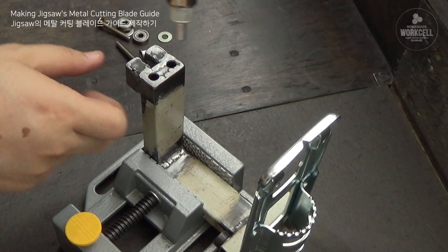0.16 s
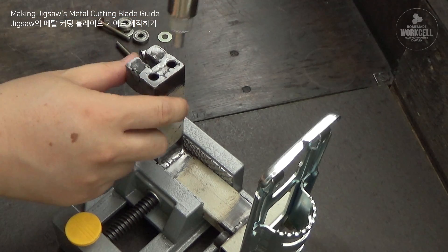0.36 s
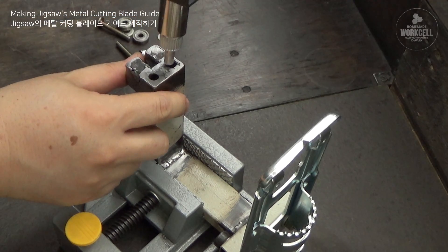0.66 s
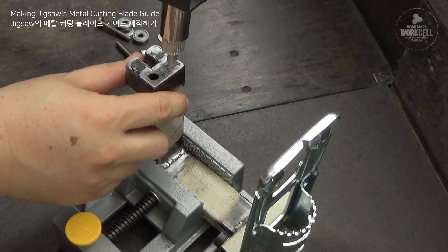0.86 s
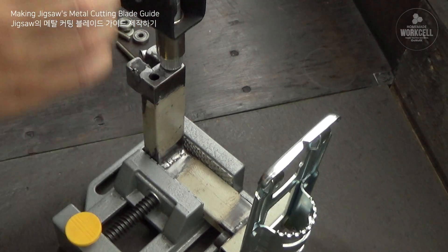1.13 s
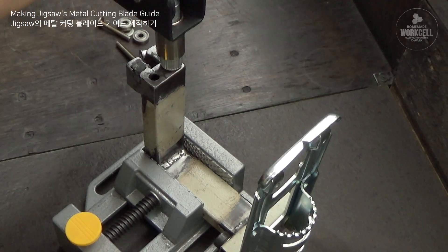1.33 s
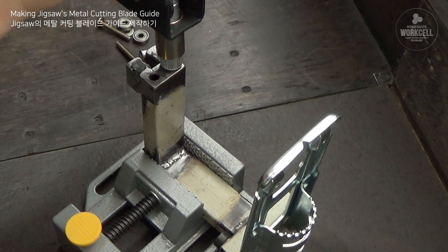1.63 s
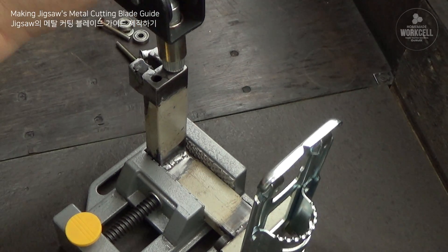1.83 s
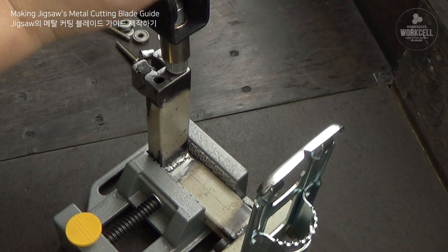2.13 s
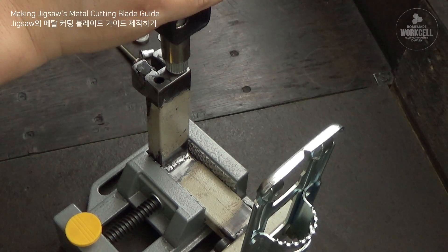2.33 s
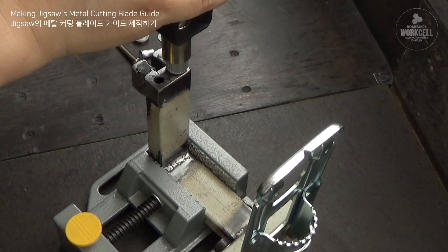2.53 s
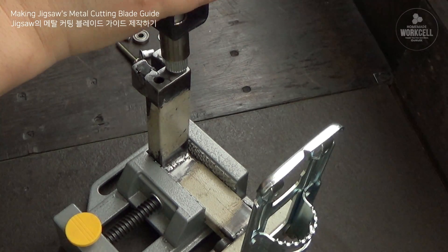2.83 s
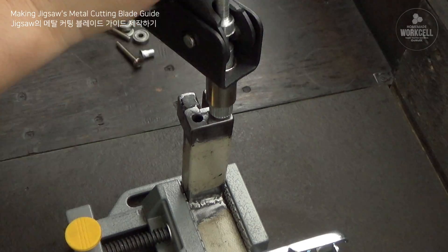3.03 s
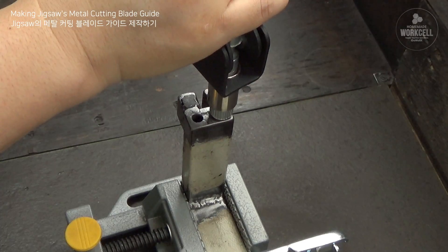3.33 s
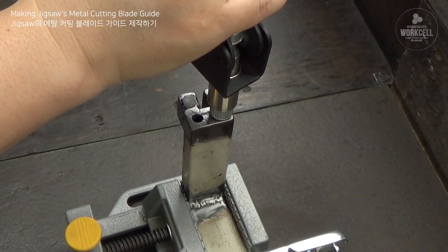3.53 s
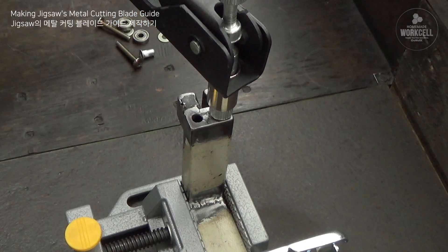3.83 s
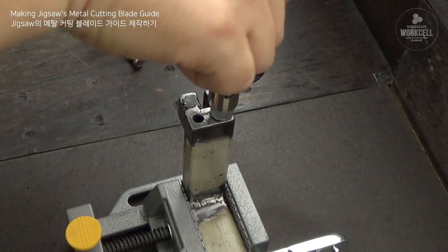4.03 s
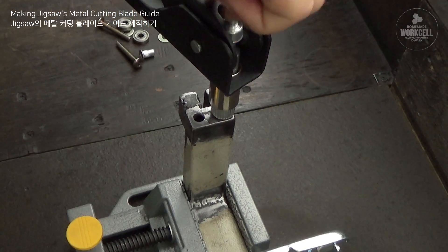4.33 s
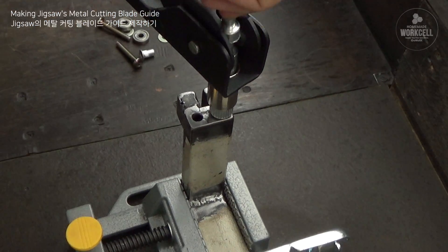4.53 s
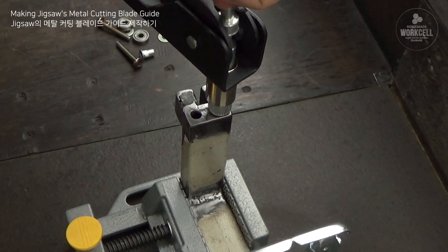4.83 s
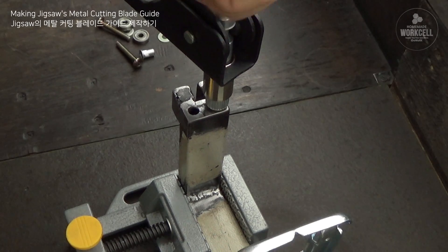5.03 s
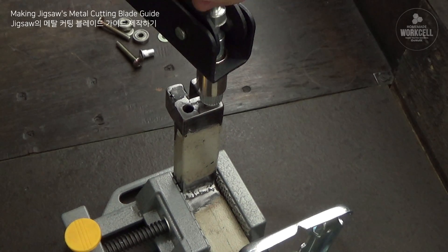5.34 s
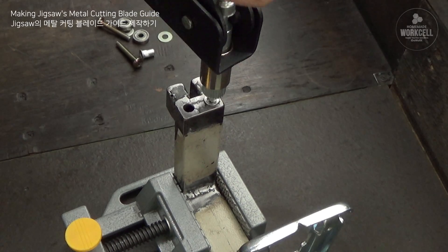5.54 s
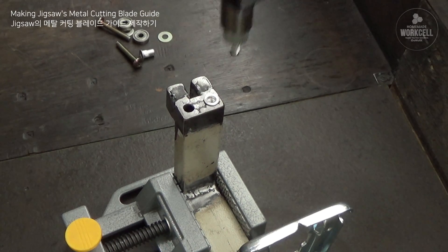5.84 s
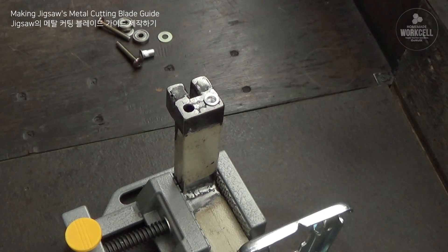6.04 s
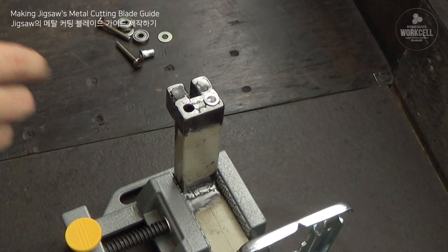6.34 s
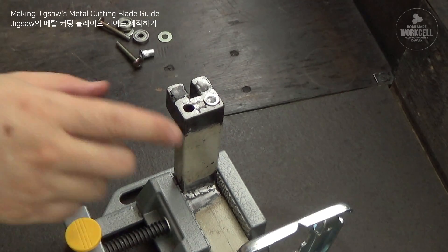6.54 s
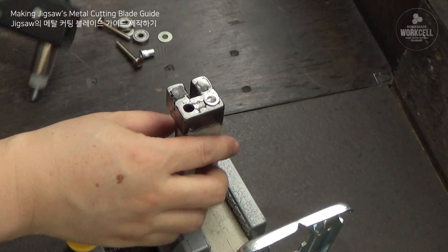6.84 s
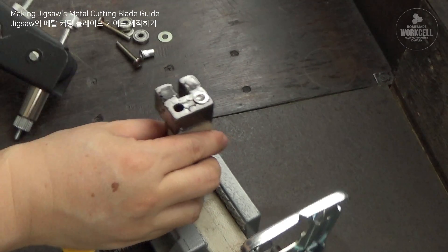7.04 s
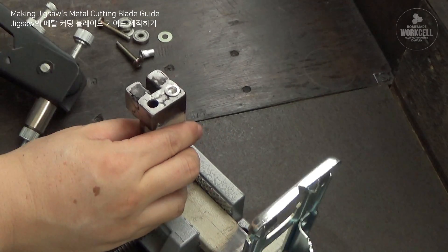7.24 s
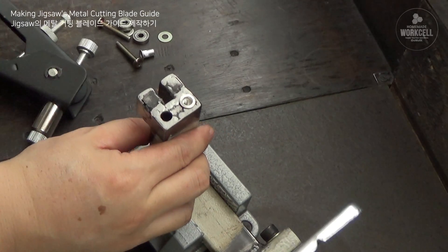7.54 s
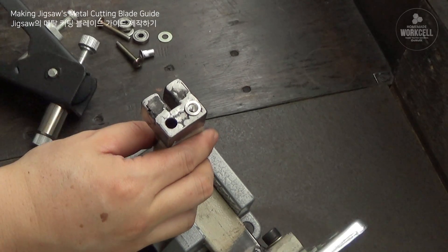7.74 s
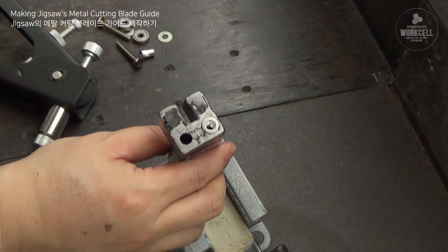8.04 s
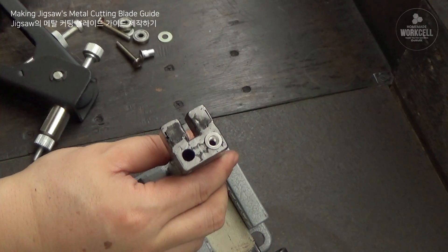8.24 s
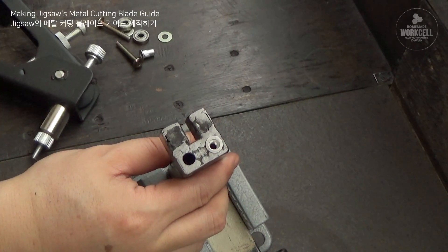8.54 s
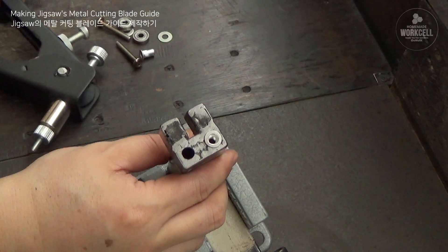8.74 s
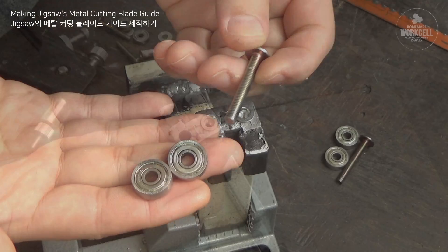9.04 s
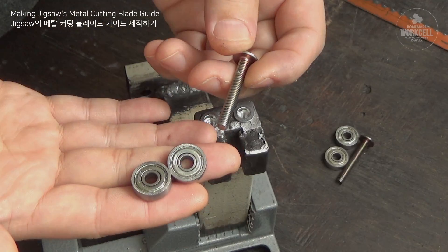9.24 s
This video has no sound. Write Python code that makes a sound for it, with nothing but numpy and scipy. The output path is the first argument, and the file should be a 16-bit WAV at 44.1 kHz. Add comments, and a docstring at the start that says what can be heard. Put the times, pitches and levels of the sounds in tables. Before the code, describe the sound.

A quiet room holds faint hiss and distant traffic. From about 0.6 seconds a hand rivet tool clinks against a steel block in a small vice, close by, with dull knocks through the wooden bench. The loudest clink and knock come near 1.1 seconds, with a brief scrape and tiny squeak; softer taps follow until 2 seconds. From 2.6 seconds the work is sped up and high-pitched: the pumped handles creak and tick lightly. From about 4.2 to 5.6 seconds the knob is unscrewed in a rapid, growing run of crunchy metallic clicks. Normal speed returns with one small clink at 5.8 seconds. At 6.9 seconds the tool lands on the bench with a bright clatter and rocks briefly. The vice is softly dragged and bumped, with a knock and clink at 7.8 seconds, another knock at 8.9 and faint rubbing afterwards.

```python
"""Rivet-nut tool at a workbench

A hand rivet-nut tool is set on a steel block in a small vice, pumped, unscrewed and laid down; the vice
is dragged and tapped on the wooden bench. Impacts excite the normal modes of wood and steel, and friction
drives them with dense clicks. Far traffic swells outside the quiet room. The pumping and unscrewing is
sped up about eight times, so all of it sounds three octaves higher."""
import sys
import numpy as np
from scipy import signal
from scipy.fft import rfft, irfft, next_fast_len
from scipy.io import wavfile

SR = 44100
rng = np.random.default_rng(int(sys.argv[2]) if len(sys.argv) > 2 else 0)


def dump(signal):
    """Clip the signal to [-1, 1] and save it as 16-bit WAV at the path in sys.argv[1]."""
    limited = np.clip(np.atleast_2d(signal).T, -1, 1)
    pcm = np.round(limited * 32767).astype(np.int16)
    wavfile.write(sys.argv[1], SR, pcm)


N = 413658

FAST_FROM_S, FAST_TO_S, SPEEDUP = 2.642, 5.632, 7.8
# modes of bench and vice: (frequency [Hz], level [dB], level when sped up [dB], t60 [s])
BENCH_MODES = [(129.5, -4, -2, 0.23), (183.6, -6, -29, 0.15), (281, -1, -14, 0.15), (359.3, -9, -5, 0.12),
               (386, 1, -16, 0.05), (478, 4, 5.5, 0.092), (585, -4, 0, 0.099), (665, -1, 3, 0.09),
               (800, 0.5, 4, 0.03), (1157, -20.5, 2.5, 0.056), (1995, -35, -8, .08)]
# blows to the bench: (time [s], level [dB], centre frequency [Hz], boost of the deepest mode [dB])
BENCH_BLOWS = [(0.628, -29, 593, 5), (0.635, -46, 573, 0.5), (0.761, -36, 482, -2), (0.798, -44, 286, -8),
               (0.927, -44, 142.5, 2.5), (0.953, -42.5, 131.4, -2.5), (1.114, -32, 585, 0),
               (1.146, -17.5, 445, -7), (1.558, -50, 323, 12), (1.591, -49.5, 503, 15.5),
               (1.602, -44, 554, 1.5), (1.66, -46.5, 137, -0.5), (1.793, -48, 358, -2.5),
               (1.884, -64.5, 126, 4.5), (6.899, -32.5, 299, 6.5), (7.013, -41.5, 288, 8.5),
               (7.079, -33.5, 315, -1.5), (7.47, -48, 176, -3), (7.626, -53, 734, 0),
               (7.798, -31, 448, -4.5), (7.806, -29.5, 405, -6), (7.817, -29, 298, -5),
               (8.169, -61, 152, 0.5), (7.877, -51, 330, -1.5), (8.882, -31, 514, -5)]


def from_db(db):
    """Amplitude ratio of a level in decibels."""
    return np.exp(np.asarray(db) * (np.log(10) / 20))


def unit_rms(x):
    """Normalisation to a root mean square of 1."""
    return x / np.sqrt(np.mean(x ** 2) + 1e-20)


def add(out, start_s, sound):
    """Superposition of a short sound on out."""
    i = round(start_s * SR)
    out[i:i + len(sound)] += sound[:N - i]


def filtered(x, order, edge_hz, kind="low"):
    """Butterworth filtering: a maximally flat passband."""
    return signal.sosfilt(signal.butter(order, edge_hz, kind, fs=SR, output="sos"), x + 1e-18)


def at_hz(points, hz):
    """Interpolation of (frequency, value) points on a logarithmic frequency axis."""
    known_hz, values = np.transpose(points)
    return np.interp(np.log(hz), np.log(known_hz), values)


def shaped(x, spectrum):
    """Zero-phase filtering by a curve of (frequency [Hz], gain [dB])."""
    size = next_fast_len(N)
    hz = np.maximum(np.arange(size // 2 + 1) * SR / size, 1)
    return irfft(rfft(x, size) * from_db(at_hz(spectrum, hz)), size)[:N]


def ring(x, hz, t60):
    """Damped resonator: a unit impulse starts a decaying sine of amplitude 1."""
    radius, angle = from_db(-60 / (t60 * SR)), 2 * np.pi * min(hz, .45 * SR) / SR
    return signal.lfilter([0, np.sin(angle)], [1, -2 * radius * np.cos(angle), radius ** 2], x + 1e-18)


def drift(rate_hz):
    """Slow random modulation: low-passed noise of rms 1."""
    pole = np.exp(-2 * np.pi * rate_hz * 40 / SR)   # one value every 40 samples
    slow = signal.lfilter([1], [1, -2 * pole, pole ** 2], rng.standard_normal(N // 40 + 2002))[2000:]
    return np.interp(np.arange(N) / 40, np.arange(len(slow)), unit_rms(slow))


def clicks(per_s, spread_db):
    """Shot noise: random impulses of uneven size, rms 1."""
    sizes = from_db(spread_db * np.minimum(rng.exponential(1, N), 5)) * rng.choice([-1, 1], N)
    return unit_rms(sizes * (rng.random(N) < per_s / SR))


def stereo_noise(spectrum, coherence):
    """Partly coherent noise of rms 1: the mid-to-side ratio sets how alike left and right are."""
    hz = np.maximum(np.arange(N // 2 + 1) * SR / N, 1)
    alike = np.clip(at_hz(coherence, hz), 0, 1)
    mid, side = rfft(rng.standard_normal((2, N))) * from_db(at_hz(spectrum, hz))
    return unit_rms(irfft(np.sqrt(1 + alike) * mid + np.sqrt(1 - alike) * side * [[1], [-1]], N))


def swells(rows):
    """Amplitude envelopes through rows of (time [s], levels [dB]), fading out 20 ms beyond each end."""
    t = np.arange(N) / SR
    times, *levels_db = np.transpose(rows)
    gate = np.clip(np.minimum(t - times[0], times[-1] - t) / .02 + 1, 0, 1)
    return gate * from_db([np.interp(t, times, db) for db in levels_db])


def strokes(rows, rise_db_per_s, fade_db_per_s):
    """Incoherent addition: strokes rise, hold, fade and sum in power; one envelope per level column."""
    t, power = np.arange(N // 32 + 1) * 32 / SR, 0
    for start, hold, *levels_db in rows:
        loss_db = rise_db_per_s * np.maximum(start - t, 0) + fade_db_per_s * np.maximum(t - start - hold, 0)
        power = power + from_db(np.array(levels_db)[:, None] - loss_db) ** 2
    return [np.interp(np.arange(N) / SR, t, np.sqrt(p)) for p in power]


def room(x, speed):
    """Reverberation as convolution with decaying noise; speed shortens it and raises the band edges."""
    t = np.arange(round(SR / 2 / speed)) / SR
    tail_t60, early_t60 = 0.17 / speed, 0.027 / speed
    echoes = rng.standard_normal((4, len(t))) * from_db(-60 * t / tail_t60) * (t > .003 / speed)
    response = filtered(echoes[0] + echoes[1:3], 1, min(9200 * speed, 18000))
    response *= from_db(-10.5) / np.sqrt(np.sum(response ** 2) / 2)
    early = echoes[3] * from_db(-60 * t / early_t60)   # bench reflections differ left and right
    response += from_db(-14) * early / np.sqrt(np.sum(early ** 2)) * [[1], [-1]]
    left, right = x + signal.fftconvolve(x[None], response, axes=1)[:, :N]
    # long waves reach the closely spaced microphones alike, and the deep bass is lost
    side = filtered(left - right, 2, 610 * speed ** 1.1, "high")
    heard = (left + right + side * [[1], [-1]]) / 2
    return filtered(heard, 7, 110.9 * speed ** 0.841, "high")


def background():
    """Broadband noise: far traffic swells over the hiss of room and microphone."""
    # traffic, one span each side of the fast part: (time [s], roar level [dB], tyre level [dB])
    traffic_spans = [
        [(0.0, -69, -69.5), (0.6, -71.5, -75), (1.3, -65.5, -65), (1.97, -67, -68.5), (2.34, -64.5, -66),
         (2.64, -65.5, -68)],
        [(5.63, -63, -67), (6.16, -63.5, -65.5), (6.9, -69.5, -72), (7.31, -67, -65), (8.18, -69, -72.5),
         (8.83, -67, -68.5), (8.87, -61.5, -62.5), (9.38, -68.5, -64)],
    ]
    # spectra of traffic roar, tyre noise and hiss: (frequency [Hz], spectral level [dB])
    roar_spectrum = [(40, -38), (75, -22), (105, -22.5), (140, -4), (190, -10), (260, -8.5), (350, -6.5),
                     (480, -1), (620, -0.5), (800, 2), (1000, -11.5), (1500, -26.5), (3000, -45)]
    tyre_spectrum = [(500, -40), (900, -3), (1100, 0), (1400, -3), (1800, -6), (2300, -13), (3000, -40)]
    hiss_spectrum = [(900, -30), (1800, -3), (2300, 0), (3000, 0), (4000, -2), (5200, -4), (7000, -6),
                     (9000, -7), (11000, -10), (13500, -13), (16000, -15)]
    # likeness of left and right: (frequency [Hz], coherence [0-1])
    coherence = [(150, .99), (300, .9), (600, .75), (1500, .55), (4000, .62), (8000, .72), (13000, .93)]
    roar_gain, tyre_gain = sum(swells(span) for span in traffic_spans)
    roar = roar_gain * stereo_noise(roar_spectrum, coherence)
    tyres = tyre_gain * stereo_noise(tyre_spectrum, coherence)
    hiss_db = np.where(np.arange(N) / SR < 8.85, -71.5, -68)   # steps up near the end
    return roar + tyres + from_db(hiss_db) * stereo_noise(hiss_spectrum, coherence)


def fast_background():
    """Time compression shifts the noise of traffic and room into the treble."""
    # swell of the noise: (time [s], level [dB])
    levels = [(2.64, -64.5), (3.09, -60), (3.46, -68), (3.8, -69.5), (4.2, -66), (4.6, -63), (4.98, -61.5),
              (5.63, -67.5)]
    # its spectrum: (frequency [Hz], spectral level [dB])
    spectrum = [(120, -76), (200, -38), (851, -23), (1000, -11), (1680, -18), (1840, -16), (2560, -15.5),
                (2700, -13), (3370, -9.5), (3690, -9.5), (4680, -8), (5040, -6.5), (16000, -18.5)]
    # likeness of left and right: (frequency [Hz], coherence [0-1])
    coherence = [(60, 0.24), (240, 0.78), (950, 1), (3770, 0.939), (15000, 0.59)]
    return swells(levels) * stereo_noise(spectrum, coherence)


def engine():
    """Periodic firing gives a harmonic series, rising as an engine pulls away outside."""
    # the sped-up engine: (time [s], firing frequency [Hz], level [dB])
    run_up = [(2.649, 321, -81), (2.9, 337.7, -94.5), (3.1, 351, -78), (3.25, 359.4, -81.5),
              (3.397, 368.6, -98)]
    # its harmonics: (order [multiple of the firing frequency], level [dB])
    harmonics = [(1, -21), (3, -1.5), (4, -0.5), (6, 3), (8, 4), (10, 6.5)]
    times, firing_hz, level_db = np.transpose(run_up)
    t = np.arange(N) / SR
    phase = 2 * np.pi * np.cumsum(np.interp(t, times, firing_hz)) / SR
    tones = sum(from_db(db + 2 * drift(20)) * np.sin(order * phase) for order, db in harmonics)
    return from_db(np.interp(t, times, level_db, right=-200)) * tones


def squeaks():
    """Stick-slip friction: dense slips of steel pass twice through one narrow resonance."""
    # squeaks of sliding steel: (time [s], hold [s], frequency [Hz], level [dB])
    events = [(1.044, 0.026, 5410, -64.5), (1.048, 0.053, 4590, -71), (1.05, 0.094, 8240, -65),
              (1.076, .04, 6700, -63), (1.862, 0.065, 7960, -69), (1.879, 0.047, 9750, -68.5)]
    slips, out = clicks(8000, 1.9), np.zeros(N)
    for start, hold, hz, db in events:
        envelope, = strokes([(start, hold, db)], 500, 500)
        out += envelope * unit_rms(ring(ring(slips, hz, t60=.012), hz, t60=.012))
    return out


def steel_friction():
    """Roughness noise: steel on steel rasps, while the denser contacts of skin on steel hiss."""
    # steel scraping steel; fingers and tool sliding over it: (time [s], hold [s], level [dB])
    scrapes = [(0.98, 0.013, -63.5), (1.11, .025, -55), (1.18, 0.0042, -42), (7.79, 0.038, -60)]
    slides = [(1.86, 0.028, -65), (7.1, 0.0287, -56.5), (7.3, 0.237, -66), (8.17, 0.037, -71.5)]
    # spectra of the two contacts: (frequency [Hz], spectral level [dB])
    scrape_spectrum = [(590, -35), (1000, -21), (2040, -40.5), (2160, -10), (2840, -5.5), (4080, -15),
                       (4460, -8.5), (5860, -10), (6710, -5), (15000, -22.5)]
    slide_spectrum = [(1060, -26), (1800, -18.5), (2540, 3), (3790, 4), (5270, -0.5), (7060, -1.5),
                      (8580, 3), (10500, 2), (12800, -14), (15000, -29)]
    rasp = strokes(scrapes, 220, 500)[0] * unit_rms(shaped(clicks(5000, 1.194), scrape_spectrum))
    hiss = strokes(slides, 200, 80)[0] * unit_rms(shaped(clicks(13000, 2.26), slide_spectrum))
    return rasp + hiss


def bench_rumble():
    """Forced vibration: clicks drive the bench modes as the loose vice drags, or shudders after a blow."""
    # vice and tool dragged or pressed: (time [s], hold [s], deep level [dB], upper level [dB])
    drags = [(0.95, 0.0205, -57, -76.5), (1.1, 0.015, -55, -50.5), (1.6, 0.048, -62.5, -65.5),
             (1.81, 0.0106, -72.5, -73), (1.885, 0.0455, -58.5, -57.5), (7.14, 0.0225, -70, -52.5),
             (7.36, 0.0287, -76.5, -56.5), (7.41, 0.066, -55, -83.5), (7.66, .02, -74, -84.5),
             (7.77, 0.032, -72, -59), (8.09, 0.0176, -72, -68.5), (8.99, 0.073, -73.5, -73),
             (9.18, 0.026, -86, -67), (9.33, 0.027, -78, -63.5)]
    deep_gain, upper_gain = strokes(drags, 295.5, 185.5)
    shudder, = strokes([(start, 0, db - 14.5) for start, db, _, _ in BENCH_BLOWS], 5000, 260)
    roughness = clicks(740, 4.42)
    deep = sum(from_db(db) * ring(roughness, hz, t60) for hz, db, _, t60 in BENCH_MODES[:2])
    upper = sum(from_db(db) * ring(roughness, hz, t60 / 4) for hz, db, _, t60 in BENCH_MODES[2:])
    return (deep_gain + from_db(-1.5) * shudder) * unit_rms(deep) + (upper_gain + shudder) * unit_rms(upper)


def knocks():
    """Modal impact response: the point struck picks the loudest bench mode; small rebounds follow."""
    out, t = np.zeros(N), np.arange(round(SR / 2)) / SR
    rise_cycles, deepest_hz = 0.47, BENCH_MODES[0][0]
    scatter = rng.standard_normal((len(BENCH_BLOWS), len(BENCH_MODES)))
    for (start, level_db, centre_hz, deep_db), chances in zip(BENCH_BLOWS, scatter):
        modes = 0
        for (hz, db, _, t60), chance in zip(BENCH_MODES, chances):
            mode_db = db + deep_db * (hz == deepest_hz) + 2 * chance - 6.12 * np.log2(hz / centre_hz) ** 2
            build_up = (1 - np.exp(-t * hz / rise_cycles)) ** 2
            modes += build_up * from_db(mode_db - 60 * t / t60) * np.sin(2 * np.pi * hz * t + chance)
        noise = filtered(rng.standard_normal(len(t)), 2, [centre_hz / 2, centre_hz * 3], "band")
        rebounds = unit_rms(noise) * from_db(-17 - 60 * t / 0.13)
        add(out, start, from_db(level_db) * (modes / np.abs(modes).max() + rebounds))
    return out


def clinks(impacts, body_modes, rattle_depth, loose_db):
    """Free vibration of struck steel: a crack, then ringing modes that loose parts roughen and buzz over."""
    out, t = np.zeros(N), np.arange(round(SR / 4)) / SR
    spread_octaves, top_hz, rattle_hz = 0.78, 11800, 200
    scatter = rng.standard_normal((len(impacts), len(body_modes)))
    for (start, level_db, centre_hz, decay_s), chances in zip(impacts, scatter):
        modes = 0
        for (hz, db, mode_t60), chance in zip(body_modes, chances):
            mode_db = db + 2.5 * chance - 6 * (np.log2(hz / centre_hz) / spread_octaves) ** 2
            t60 = min(mode_t60, .12) * decay_s / 0.041
            detuned_hz = hz * (1 + 0.0073 * chance)
            modes += from_db(mode_db - 60 * t / t60) * np.sin(2 * np.pi * detuned_hz * t + chance)
        modes *= 1 + rattle_depth * unit_rms(filtered(rng.standard_normal(len(t)), 2, rattle_hz))
        low_hz = centre_hz / 2 ** (1.7 * spread_octaves)
        high_hz = min(centre_hz * 2 ** (1.31 * spread_octaves), top_hz)
        noise = unit_rms(filtered(rng.standard_normal(len(t)), 2, [low_hz, high_hz], "band"))
        crack = 3.1 * noise * from_db(-60 * t / 0.015)
        buzz = noise * from_db(-60 * t / (1.8 * decay_s))
        noise_gain = from_db(loose_db - 12 + .35 * min(level_db + 24, 0))   # softer blows buzz less
        add(out, start, from_db(level_db) * (modes / np.abs(modes).max() + noise_gain * (crack + buzz)))
    return filtered(out, 4, top_hz)


def block_clinks():
    """Impacts excite the inharmonic modes of the steel block and tool tip."""
    # modes of block and tip: (frequency [Hz], level [dB], nominal t60 [s])
    modes = [(1550, -4, 0.052), (2146, -0.5, 0.08), (2572, -6.5, .06), (2805, 2.5, 0.058),
             (3170, 0.5, 0.07), (3670, 0.5, 0.075), (4293, -4, 0.096), (4900, -17, 0.088),
             (5600, -3.5, 0.13), (6140, 1, 0.097), (6540, -1.5, 0.12), (7170, -8, 0.12), (7260, 3, 0.095),
             (8080, -2.5, 0.11), (9000, -7, 0.1), (9590, 1.5, 0.06), (10310, -7.5, .06), (11710, -8.5, .06)]
    # steel meets steel: (time [s], level [dB], centre frequency [Hz], decay scale [s])
    impacts = [(0.628, -31, 1800, 0.023), (0.633, -33, 7640, 0.0363), (0.764, -44, 2900, 0.026),
               (0.762, -46, 9500, 0.041), (0.778, -40.5, 6650, 0.0278), (0.8022, -34, 7740, 0.0328),
               (0.968, -34.5, 9400, 0.0253), (1.109, -38.5, 7950, 0.09), (1.137, -42.5, 7510, 0.073),
               (1.1414, -28, 7100, 0.0455), (1.1505, -21.5, 6650, 0.033), (1.4915, -53, 2750, 0.03),
               (1.559, -46, 3300, 0.045), (1.604, -50, 3500, 0.025), (5.7582, -39.5, 2900, 0.045),
               (7.6253, -46, 3030, 0.045), (1.789, -44, 3660, 0.032), (2.0913, -55, 2610, 0.0705),
               (7.8165, -37.5, 2230, 0.066), (8.234, -45, 8890, 0.018), (8.392, -58, 5000, 0.11)]
    return clinks(impacts, modes, rattle_depth=.45, loose_db=0)


def tool_landing():
    """Repeated impacts excite the modes of the tool as it is laid down and rocks."""
    # modes of the tool's body: (frequency [Hz], level [dB], nominal t60 [s])
    modes = [(2153, 2.5, 0.14), (2394, 6, 0.082), (2910, -5.5, 0.064), (3457, -11, 0.086),
             (3940, 1.5, 0.049), (4325, -11.5, 0.081), (5042, -5.5, 0.14), (5740, -16.5, 0.12),
             (6383, -5.5, 0.11), (6700, -3, .12), (7173, -10, 0.12), (8790, -5.5, 0.102),
             (10120, -5, 0.098), (12000, -23.5, .04)]
    # landings: (time [s], level [dB], centre frequency [Hz], decay scale [s])
    impacts = [(6.9, -23, 6500, 0.054), (6.908, -25, 3620, 0.074), (6.911, -26.5, 4530, 0.103),
               (6.919, -29, 3230, 0.094), (6.932, -29, 4570, 0.073), (7.022, -40.5, 8000, 0.0245),
               (7.076, -41.5, 6000, 0.048), (7.08, -28.5, 5250, 0.027)]
    return clinks(impacts, modes, rattle_depth=.9, loose_db=3)


def catch_envelopes():
    """Transient excitation: each catch briefly swells the bright, dull, thud and treble contacts."""
    # handle or thread catches: (time [s], bright level [dB], dull level [dB], thud level [dB])
    catches = [(2.678, -62.5, -74.5, -45.5), (2.813, -63.5, -71.5, -57.5), (2.933, -61, -58, -38.5),
               (2.948, -59, -62.5, -40.5), (3.174, -48.5, -61, -78.5), (3.233, -55, -61.5, -50.5),
               (3.25, -61.5, -65, -61), (3.268, -64, -65, -53.5), (3.332, -69, -69.5, -59),
               (3.355, -67, -66, -48), (3.469, -54, -59.5, -53.5), (3.986, -60.5, -59, -55),
               (4.022, -49, -66, -78.5), (4.084, -55.5, -54, -37.5), (4.142, -55, -72, -81),
               (4.201, -44.5, -54, -56.5), (4.2524, -47, -64.5, -54), (4.2796, -47, -56.5, -53.5),
               (4.3462, -34, -51, -62.5), (4.355, -29.5, -48.5, -49.5), (4.3678, -28.5, -41, -44.5),
               (4.416, -49, -61, -66.5), (4.4288, -40, -60, -60), (4.439, -42, -55.5, -52),
               (4.48, -48.5, -63, -68), (4.494, -40.5, -53, -59), (4.499, -33.5, -47, -37),
               (4.543, -45.5, -57.5, -52.5), (4.561, -54, -45, -39.5), (4.568, -54.5, -49.5, -51),
               (4.6157, -52, -70.5, -55.5), (4.632, -47, -61, -51), (4.642, -46, -49.5, -57.5),
               (4.637, -47, -48.5, -43), (4.678, -55, -57.5, -58), (4.6928, -55, -52.5, -38),
               (4.708, -57, -52, -57), (4.741, -56, -71.5, -72.5), (4.759, -48, -55, -52.5),
               (4.872, -45.5, -52.5, -66.5), (4.884, -38.5, -47.5, -69.5), (4.908, -46, -50, -44),
               (4.933, -35, -42.5, -38), (4.992, -52.5, -48.5, -49.5), (5.002, -32.5, -38, -67.5),
               (5.0286, -57.5, -57, -44), (5.0557, -45, -50, -41), (5.048, -48, -60.5, -54),
               (5.072, -35, -38, -48.5), (5.086, -42, -46.5, -43.5), (5.1128, -47, -50, -68.5),
               (5.121, -41.5, -43, -43.5), (5.18, -46.5, -53, -54), (5.194, -35, -55.5, -63),
               (5.198, -36, -35.5, -62), (5.232, -43, -47.5, -59.5), (5.2403, -36, -41, -55.5),
               (5.252, -34, -43, -42.5), (5.3013, -38, -63, -39.5), (5.323, -38, -47.5, -38),
               (5.349, -43.5, -48.5, -37), (5.3617, -49, -43, -33.5), (5.388, -41, -50.5, -42.5),
               (5.4092, -55.5, -50.5, -53), (5.43, -40.5, -50.5, -69), (5.452, -28.5, -42, -45),
               (5.49, -43, -52.5, -44.5), (5.51, -35.5, -49, -39.5), (5.547, -32.5, -55.5, -57),
               (5.5704, -43, -47.5, -50.5), (5.5841, -37, -51.5, -34), (5.6151, -39, -61.5, -55.5)]
    # dry ticks in the treble only: (time [s], level [dB])
    ticks = [(3.6299, -44), (4.2006, -52.5), (4.4149, -53.5), (4.6366, -36.5), (4.6784, -46.5),
             (4.742, -44.5), (4.757, -48.5)]
    rise_s, fade_s, tick_fade_s = 0.001085, 0.003034, 0.001585
    envelopes, t = np.zeros((4, N)), np.arange(round(SR / 10)) / SR
    swell = (1 - np.exp(-t / rise_s)) * np.exp(-t / fade_s)
    swell /= swell.max()
    for start, bright_db, dull_db, thud_db in catches:
        treble_db = bright_db - 10.5 + rng.standard_normal()
        for envelope, db in zip(envelopes, (bright_db, dull_db, thud_db, treble_db)):
            add(envelope, start, from_db(db) * swell)
    for start, db in ticks:
        add(envelopes[3], start, from_db(db) * np.exp(-t / tick_fade_s))
    return envelopes


def tool_forces():
    """Friction as modulated shot noise: each stroke of the tool is a flurry of contacts."""
    # hand actions, each (time [s], hold [s], level [dB])
    squeezes = [(2.66, 0.98, -78.5)]   # the pressed handles tick and grind faintly
    creaks = [(2.931, 0.033, -55), (2.962, 0.0106, -52), (2.985, 0.0077, -56)]   # the lever creaks as it is first pressed
    hand_shifts = [(4.016, 0.022, -50)]   # the hand slides from handle to knob
    turns = [(4.25, 0.0336, -59.5), (4.375, 0.015, -63.5), (4.418, 0.019, -63), (4.483, 0.021, -64.5),
             (4.543, 0.0436, -59), (4.625, 0.0134, -64), (4.68, 0.054, -65), (4.735, 0.0463, -61.5),
             (4.875, 0.038, -65.5), (4.932, 0.0137, -50.5), (4.992, 0.0328, -55), (5.052, 0.0266, -54.5),
             (5.116, 0.021, -52.5), (5.183, 0.019, -49), (5.236, 0.0444, -56.5), (5.3, 0.012, -50.5),
             (5.35, 0.0266, -52), (5.39, 0.0116, -55.5), (5.432, 0.0275, -48), (5.492, 0.0158, -45.5),
             (5.547, 0.0453, -46.5), (5.615, 0.019, -49.5)]   # the knob is turned grip by grip
    rise_db_per_s, fade_db_per_s, hand_fade_db_per_s = 1498, 714, 93.5
    squeeze, = strokes(squeezes, rise_db_per_s, hand_fade_db_per_s)
    shift, = strokes(hand_shifts, rise_db_per_s, hand_fade_db_per_s)
    rub = strokes(turns, rise_db_per_s, fade_db_per_s)[0] * from_db(5.5 * drift(51))
    bright_catch, dull_catch, thud_catch, treble_catch = catch_envelopes()
    contacts = clicks(10000, 1.8)
    bumps = (thud_catch + from_db(-2) * rub) * clicks(3000, 1.82)
    joint_ticks = squeeze * clicks(21, 1.4)
    creak = strokes(creaks, rise_db_per_s, fade_db_per_s)[0] * rng.standard_normal(N)
    bright = (bright_catch + rub + shift) * contacts + from_db(-3) * creak
    dull = (dull_catch + from_db(-3.5) * rub + squeeze) * contacts + creak
    thud = bumps + joint_ticks + from_db(-2) * creak
    treble = (treble_catch + from_db(-15.5) * rub) * clicks(14000, 1.6)
    return bright, dull, thud, treble, creak


def tool_work():
    """Time scaling: pumping and unscrewing drive the bench modes, raised and shortened by the speed-up."""
    # grit in the strokes: (frequency [Hz], gain [dB])
    grit_spectrum = [(180, -85), (300, -60.5), (494, -25.5), (1010, -5.5), (1730, -4.5), (2140, 8.5),
                     (2500, 2.5), (2800, 8.5), (3200, 3), (3720, 10.5), (4110, -8), (4480, 6), (4800, -6),
                     (5100, 2), (5470, -12), (7000, -10.5), (9000, -12), (11700, -39), (19800, -120)]
    crossover_hz = 3200   # dull contacts below, bright ones above
    grip_damping, wander_db = .7, 4.5   # the hand shortens the rings; the contact point shifts their levels
    bright, dull, thud, treble, creak = tool_forces()
    low_hz, low_t60 = BENCH_MODES[0][0] * SPEEDUP, BENCH_MODES[0][3] / SPEEDUP
    low_modes = ring(thud, low_hz, grip_damping * low_t60)
    low_modes -= from_db(-11 + wander_db / 2 * drift(34)) * ring(thud, 0.852 * low_hz, 0.5 * low_t60)
    low_modes += from_db(-8 + wander_db * drift(26)) * ring(thud, 0.508 * low_hz, 0.69 * low_t60)
    bench = from_db(-26.5) * low_modes
    for k, (hz, _, fast_db, t60) in enumerate(BENCH_MODES[1:]):
        force = from_db(4) * dull if hz * SPEEDUP < crossover_hz else bright
        mode = ring(force, hz * SPEEDUP, grip_damping * t60 / SPEEDUP)
        bench += (-1) ** k * from_db(fast_db - 30.5 + wander_db * drift(31)) * mode
    lever_joint = from_db(-25) * ring(creak, hz=2690, t60=0.0067)
    grit = filtered(from_db(10) * dull, 3, crossover_hz) + filtered(bright, 3, crossover_hz, "high")
    crunch = from_db(-7) * shaped(grit, grit_spectrum)
    sizzle = from_db(2.5) * filtered(treble, 2, 7500, "high")
    return bench + lever_joint + crunch + sizzle


def scene():
    """Superposition of the sources; the sped-up work replaces all else, with 4 ms crossfades."""
    t = np.arange(N) / SR
    fast_share = np.clip(np.minimum(t - FAST_FROM_S, FAST_TO_S - t) / .004 + .5, 0, 1)
    handling = block_clinks() + tool_landing() + knocks() + bench_rumble() + steel_friction() + squeaks()
    normal = room(handling, speed=0.947) + background()
    fast = fast_background() + engine() + room(tool_work(), SPEEDUP)
    return (1 - fast_share) * normal + fast_share * fast


def record(dry):
    """Band limiting: a steep low-pass removes the highest treble."""
    stopband_hz = 16218
    return signal.sosfilt(signal.cheby2(20, 70, stopband_hz, fs=SR, output="sos"), dry)


dry = scene()
out = record(dry)
dump(out)
```